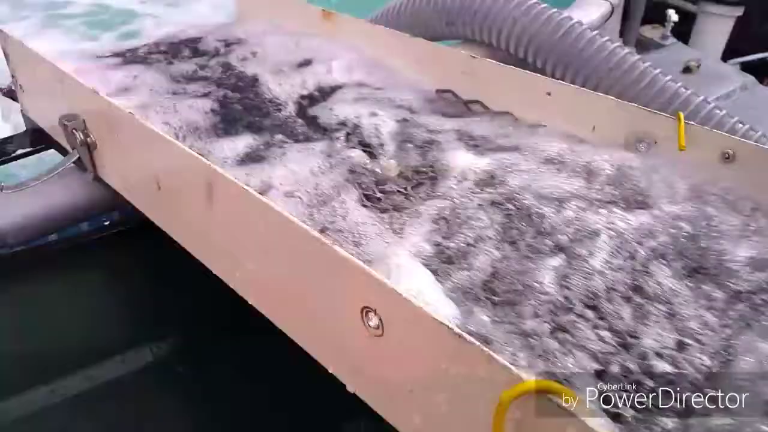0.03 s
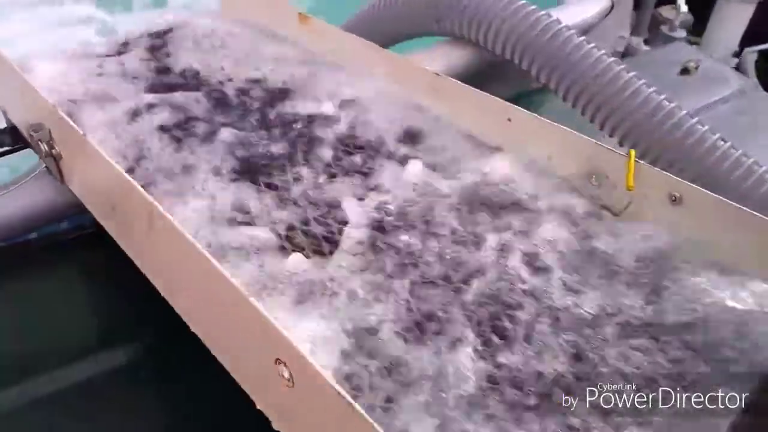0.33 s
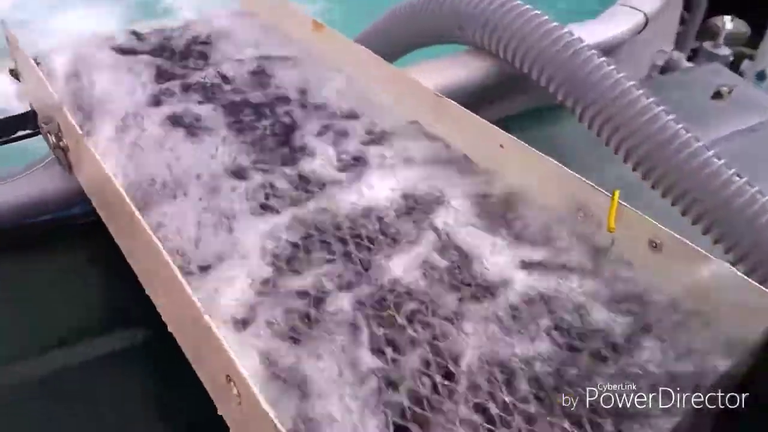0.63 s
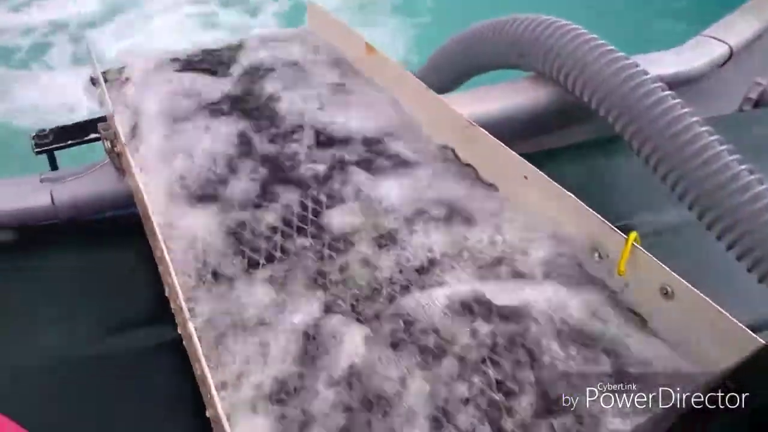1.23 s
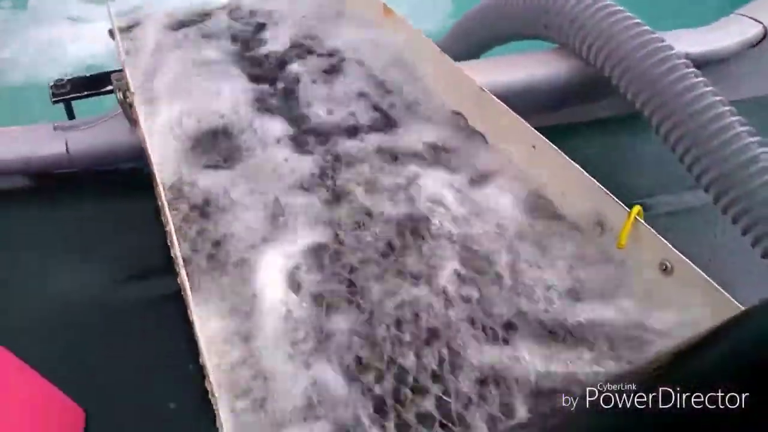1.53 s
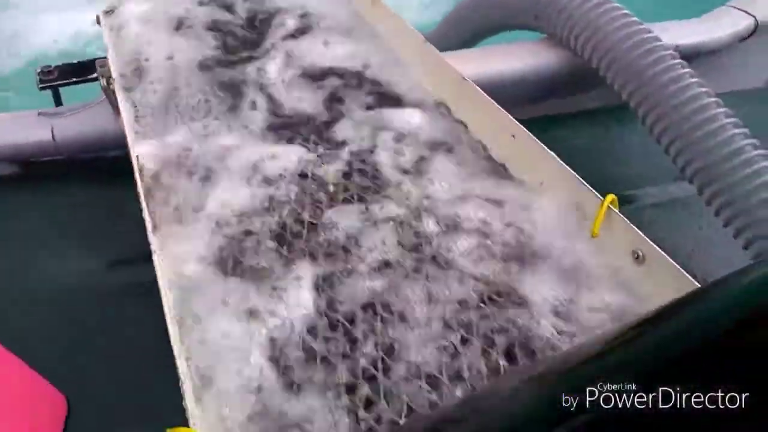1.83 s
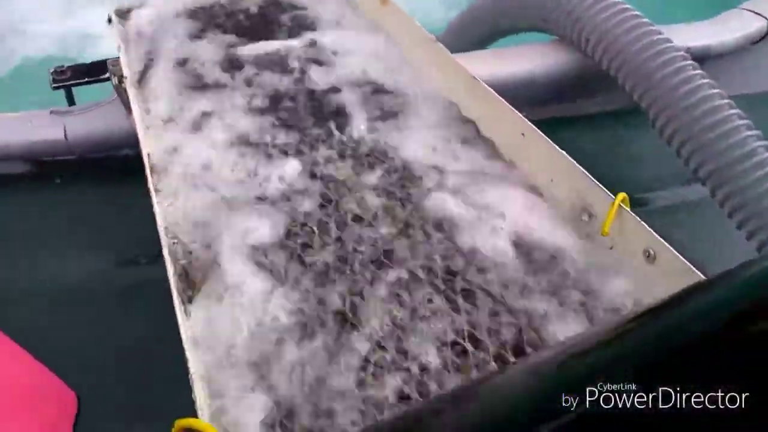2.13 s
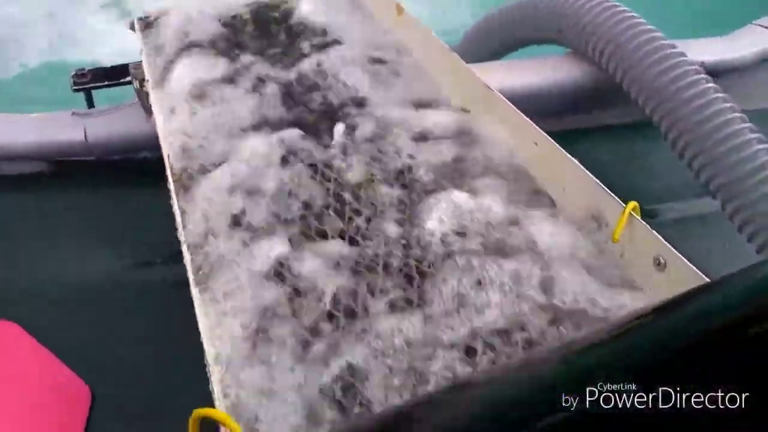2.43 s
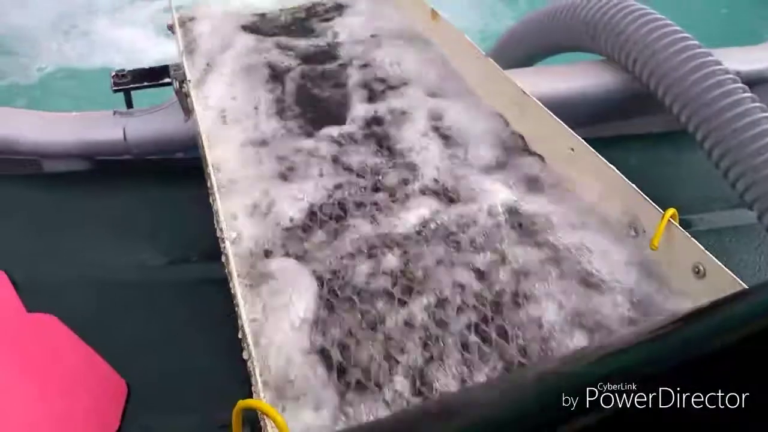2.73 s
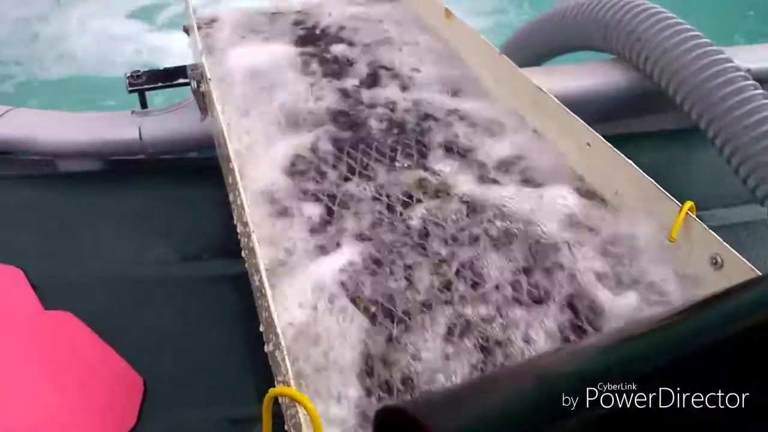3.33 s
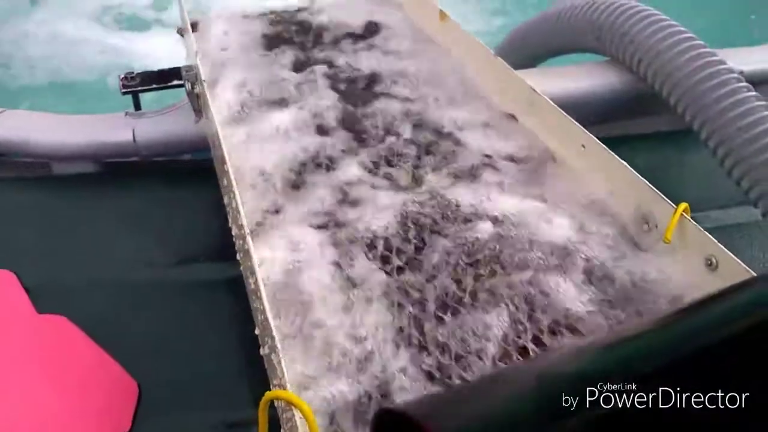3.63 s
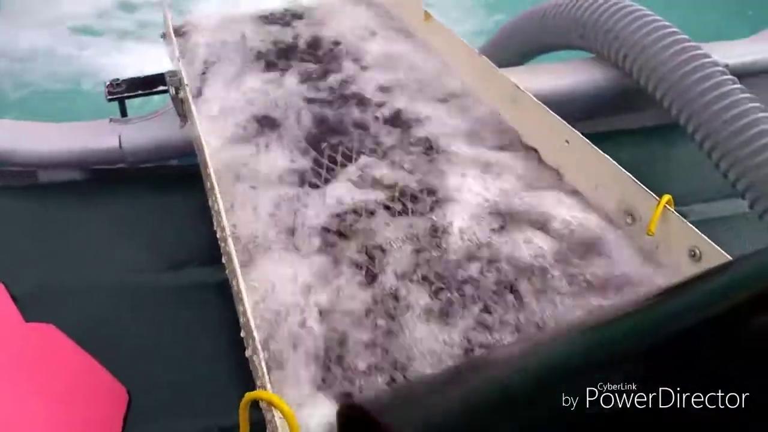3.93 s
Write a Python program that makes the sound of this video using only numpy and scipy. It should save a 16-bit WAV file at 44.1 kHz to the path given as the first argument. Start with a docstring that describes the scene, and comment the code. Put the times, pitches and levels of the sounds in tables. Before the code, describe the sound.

Water rushes and bubbles steadily down a metal sluice box outdoors, close by, with hissing foam and scattered glugs. A pump engine drones beside it, its low throb growing stronger in the second half.

```python
"""Water churns down a metal sluice box outdoors, while a one-cylinder pump engine runs beside it.
Tumbling over the riffles (the ridges in the box), the water rushes and traps air, which rings as a
mass of small bubbles and a few loud glugs. Spray hisses, foam fizzes and stray drops tick.
The engine's exhaust drones and puffs, its lowest tones throb through the hull, and the pump whistles.
Two closely spaced microphones pick it all up, and their stereo image is widened."""
import sys
import numpy as np
from scipy import signal
from scipy.fft import rfft, irfft
from scipy.io import wavfile

SR = 44100
rng = np.random.default_rng(int(sys.argv[2]) if len(sys.argv) > 2 else 0)


def dump_mix(stems):
    """Bounce the given channels to the path in sys.argv[1] as a 16-bit WAV at rate SR."""
    frames = np.atleast_2d(stems).T  # one column per channel
    limited = np.clip(frames, -1, 1)  # hard clip at full scale
    pcm = np.round(limited * 32767).astype(np.int16)
    wavfile.write(sys.argv[1], SR, pcm)


N = 176400  # samples: 4 seconds


def from_db(db):
    """Turn decibels into a number to multiply by."""
    return 10 ** (np.asarray(db) / 20)


def rms_one(x):
    """Scale a signal so that its average power is 1."""
    return x / np.sqrt(np.mean(x ** 2) + 1e-20)


def in_time(rows):
    """Join (time, value) points with straight lines, giving a value for every sample."""
    return np.interp(np.arange(N) / SR, *np.transpose(rows))


def at_hz(points, hz):
    """Look up (pitch, value) points on a scale where every octave is equally wide."""
    freqs, values = np.transpose(points)
    return np.interp(np.log(hz + 1e-9), np.log(freqs), values)


def bins():
    """The frequency in Hz of each slot in a spectrum."""
    return np.arange(N // 2 + 1) * SR / N


def drift(rate_hz):
    """A smooth random wobble, about 1 in size; a higher rate wobbles faster."""
    step, warm_up = 40, 2000  # one random value every 40 samples
    memory = np.exp(-2 * np.pi * step * rate_hz / SR)
    noise = rng.standard_normal(N // step + warm_up + 2)
    slow = signal.lfilter([1], [1, -2 * memory, memory * memory], noise)[warm_up:]
    return np.interp(np.arange(N) / step, np.arange(len(slow)), rms_one(slow))


def pan(db):
    """Share a sound between left and right: positive dB leans left, negative leans right."""
    gains = from_db(np.array([np.atleast_1d(db), -np.atleast_1d(db)]) / 2)
    return gains / np.sqrt(np.mean(gains ** 2, axis=0))


def place(x, pan_db, lag_s):
    """Lean a stereo sound to one side and delay its right channel."""
    late_right = irfft(rfft(x[1]) * np.exp(-2j * np.pi * bins() * lag_s), N)
    return pan(pan_db) * np.array([x[0], late_right])


def colour(white, spectrum):
    """Shape the lows and highs of plain noise with (pitch, dB per Hz) points."""
    return irfft(rfft(white) * from_db(at_hz(spectrum, bins())) * np.sqrt(SR / 2), N)


def turbulence(likeness, patchy_db, flicker_hz, bands):
    """Noise in bands that each flicker on their own; likeness 1 makes left and right the same."""
    mid, side = rfft(rng.standard_normal((2, N)))
    both = np.sqrt(1 + likeness) * mid + np.sqrt(1 - likeness) * side * [[1], [-1]]
    edges_hz = np.r_[0, np.geomspace(200, SR / 2, bands)]
    out = 0
    for low, high in zip(edges_hz, edges_hz[1:]):
        band = irfft(both * ((bins() >= low) & (bins() < high)), N)
        out = out + band * from_db(patchy_db * drift(flicker_hz))
    return rms_one(out)


def ring_bubbles(rows, rise_per_cycle=0.022):
    """Each bubble swells, rings and dies away, while its pitch can slide upward."""
    out = np.zeros((2, N + SR))
    for peak_s, hz, db, pan_db, swell_cycles in rows:
        cycles = np.arange(int(6 * swell_cycles * SR / hz)) * hz / SR
        age = cycles / swell_cycles  # 1 at the loudest moment
        loudness = (age * np.exp(1 - age)) ** 2
        glide = rise_per_cycle * (cycles - swell_cycles) ** 2 / 2
        ring = loudness * np.sin(2 * np.pi * (cycles + glide))
        start = max(int((peak_s - swell_cycles / hz) * SR), 0)
        out[:, start:start + len(ring)] += from_db(db) * pan(pan_db) * ring
    return out[:, :N]


def whine(pitch_hz=5070, width_hz=41, level_db=-49.5):
    """The pump's thin, unsteady whistle: a very narrow band of noise."""
    peak = 1 / (1 + ((bins() - pitch_hz) / width_hz) ** 2)
    whistle = irfft(rfft(rng.standard_normal((2, N))) * peak, N)
    return from_db(level_db) * pan(-12) * rms_one(whistle)


# How strongly the hull throbs. Columns: time_s, level_db
HULL_THROB = [(0, -8), (1.2, -0.5), (2.2, -3.5), (2.7, 8), (4, 5.5)]


def rumble(level_db=-3):
    """Low noise that swells with the hull's throb, by twice as many decibels."""
    noise = rng.standard_normal((2, N)) * from_db(level_db + 2 * in_time(HULL_THROB))
    return colour(noise, [(60, -96), (95, -74.5), (130, -64.5), (160, -72.5), (220, -100), (500, -130)])


# How often the cylinder fires. Columns: time_s, rate_hz
FIRING_RATE = [(0, 27.38), (2, 27.61), (4, 27.78)]


def count_firings():
    """The engine's running count of firings, rising smoothly by 1 from each to the next."""
    return np.cumsum(in_time(FIRING_RATE)) / SR


def exhaust_puffs(firings, level_db=-40, sharpness=1.5, pan_db=-4):
    """A puff of exhaust noise each time the cylinder fires."""
    puffs = rng.standard_normal((2, N)) * np.exp(sharpness * np.cos(2 * np.pi * firings))
    spectrum = [(100, -64), (400, 11), (700, -5), (1500, -7.5), (3500, -4.0), (12000, -33)]
    return from_db(level_db) * pan(pan_db) * rms_one(colour(puffs, spectrum))


# The tones in the exhaust's drone. Columns: times_firing_rate, level_db, left_minus_right_db
EXHAUST_TONES = [(2, -10, 2), (3, -13, -3), (4, -12.5, -2), (5, -12.5, 7), (6, 2.5, -6), (7, -11.5, -12),
                 (8, -10.5, -10), (10, -6.5, 2.5), (11, -9, -2), (12, -1.5, -8.5), (13, -5.5, -2),
                 (14, -2, -11), (15, -4.5, -21), (16, -11, 3), (17, -8.5, -16), (19, -18, -15),
                 (21, -7.5, -1)]


def exhaust_drone(firings, level_db=-33, hull_top_hz=150, jitter_rad=0.015):
    """Exhaust pulses blend into a stack of wavering tones; the lowest throb through the hull."""
    firings = firings + jitter_rad * drift(5.2) / (2 * np.pi)
    out = 0
    for multiple, tone_db, pan_db in EXHAUST_TONES:
        in_hull = multiple * FIRING_RATE[0][1] < hull_top_hz
        waver_db, right_lag_rad = (1.0, 1.68) if in_hull else (0.8, 0.93)
        throb_db = in_time(HULL_THROB) if multiple in (4, 5) else 0
        # The hull smears the pulses: each tone is shifted at random, a little apart on each side.
        smear_rad = 1.35 * rng.standard_normal() + 0.21 * rng.standard_normal((2, 1))
        phase = 2 * np.pi * multiple * firings + smear_rad - [[0], [right_lag_rad]]
        gain = from_db(level_db + tone_db + throb_db + waver_db * drift(5))
        out = out + gain * pan(pan_db) * np.cos(phase)
    return np.sqrt(2) * out


# Stray drops hitting the box. Columns: start_s, pitch_hz, level_db
STRAY_DROPS = [(0.2116, 7870, -20), (0.5282, 3920, -27.5), (1.5219, 3380, -25), (1.8557, 3420, -26),
               (2.148, 3960, -23.5)]


def drops(decay_s=0.0029, pan_db=-2):
    """Each drop lands with a tick: a quick burst of noise about an octave wide."""
    out = np.zeros(N)
    for start_s, hz, db in STRAY_DROPS:
        age_s = np.arange(N) / SR - start_s
        band = signal.butter(1, [hz / np.sqrt(2), hz * np.sqrt(2)], "band", fs=SR, output="sos")
        spatter = rms_one(signal.sosfilt(band, rng.standard_normal(N)))
        fade = (age_s >= 0) * np.exp(-np.abs(age_s) / decay_s)
        out += from_db(db) * spatter * fade
    return pan(pan_db) * out


# The splash fades as the microphones turn away, then creeps back. Columns: time_s, level_db
SPLASH_LEVEL = [(0, -7), (.2, -4.5), (.24, -10.5), (.48, -15), (.6, -39), (4, -18)]
# The splash's bright tone. Columns: pitch_hz, level_db_per_hz
SPLASH_TONE = [(2500, -76), (5500, -61), (8000, -65.5), (10500, -63), (14000, -80)]


def splash():
    """Water splashes off the end of the box with a bright hiss."""
    return colour(rng.standard_normal((2, N)) * from_db(in_time(SPLASH_LEVEL)), SPLASH_TONE)


# How strong the spray and its fizz are. Columns: time_s, level_db
SPRAY_LEVEL = [(0, 1.5), (.22, -0.5), (.48, 2.4), (.55, -0.5), (.7, -0.5), (.9, 0.5), (1.15, -0.5),
               (1.55, 0.7), (1.88, 0), (1.94, -2), (2.0, 0.5), (2.42, 0.5), (2.54, -2.3), (2.59, 0.2),
               (3.56, 0), (3.76, 2.5), (3.83, 0.5)]
# The tone of the spray's hiss. Columns: pitch_hz, level_db_per_hz
SPRAY_TONE = [(300, -68.5), (900, -69.5), (1350, -68), (1620, -59), (2000, -61.5), (2600, -65),
              (4000, -69.5), (5400, -70.5), (7000, -71.5), (8300, -71), (10500, -71.5), (14000, -79)]
# Which side each part of the hiss leans to. Columns: pitch_hz, left_minus_right_db
SPRAY_SIDES = [(1500, -10), (2300, 8.5), (3000, -6.5), (4200, -3.5), (7000, -2), (9000, -4), (10400, -0.5),
               (12000, -4), (14000, -8)]


def spray(flutter_db=0.55, crackle_db=0.5):
    """Foam and droplets hiss in quick surges, with a fine crackle."""
    surge = from_db(in_time(SPRAY_LEVEL) + flutter_db * drift(28))
    noise = turbulence(likeness=0, patchy_db=1.0, flicker_hz=44, bands=16)
    crackly = rms_one(noise * from_db(crackle_db * drift(430)))
    hiss = colour(crackly * surge, SPRAY_TONE)
    return irfft(rfft(hiss) * pan(at_hz(SPRAY_SIDES, bins())), N)


def fizz(count=3200, level_db=-48, spread_db=4.5, db_per_octave=-2, pan_db=-3, width_db=25):
    """Tiny bubbles ping as the foam breaks, over nearly three octaves."""
    when, pitch, size, where = rng.random((count, 4)).T
    octave = pitch * np.log2(7)
    hz = 1900 * 2 ** octave
    strength = np.minimum(-np.log(1 - size), 4)  # mostly small, now and then large
    db = level_db + db_per_octave * octave + spread_db * strength
    sides_db = pan_db + width_db * (2 * where - 1)
    swell_cycles = np.full(count, 18)
    pings = ring_bubbles(zip(when * N / SR, hz, db, sides_db, swell_cycles), rise_per_cycle=0)
    return from_db(in_time(SPRAY_LEVEL)) * pings


# The tone of the rushing water. Columns: pitch_hz, level_db_per_hz
RUSH_TONE = [(25, -86), (40, -82), (60, -64), (100, -63), (140, -58), (230, -66.5), (330, -59), (570, -55),
             (700, -57.5), (830, -69.5), (1100, -55.5), (1380, -71), (1600, -66), (2200, -76.5),
             (4000, -80.5)]


def rush():
    """The low roar of water tumbling down the box."""
    return colour(turbulence(likeness=0.78, patchy_db=2.5, flicker_hz=33, bands=14), RUSH_TONE)


# How strongly a bubble rings at each pitch. Columns: pitch_hz, boost_db
BUBBLE_BOOST = [(260, -1.5), (400, 0), (570, 2), (800, 3.5), (1100, 7.5), (1380, 2.5), (1600, 0),
                (2100, -35)]


def bubbles(per_second=950, level_db=-38, spread_db=3.5, width_db=5):
    """Small bubbles of trapped air ring all across the box, most faint and a few strong."""
    count = int(per_second * N / SR)
    when, pitch, size, where = rng.random((count, 4)).T
    low_hz, high_hz = BUBBLE_BOOST[0][0], BUBBLE_BOOST[-1][0]
    hz = low_hz * (high_hz / low_hz) ** (pitch ** 0.75)
    strength = np.minimum(-np.log(1 - size), 3.3)
    db = level_db + at_hz(BUBBLE_BOOST, hz) + spread_db * strength
    sides_db = width_db * (2 * where - 1)
    swell_cycles = np.full(count, 1.288)
    return ring_bubbles(zip(when * N / SR, hz, db, sides_db, swell_cycles))


# Big pockets of air bursting. Columns: peak_s, pitch_hz, level_db, swell_cycles
AIR_POCKETS = [(0.1, 544, -20, 1.88), (0.199, 660, -12, 0.56), (0.2, 880, -24, 1.54),
               (0.266, 940, -20, 1.8), (0.328, 950, -22, 1.46), (0.46, 1030, -17.5, 1.7),
               (0.539, 1510, -14, 2.4), (0.569, 1350, -20.5, 1.84), (0.764, 1430, -20.5, 2),
               (1.049, 1430, -18, 2), (1.164, 1130, -20.5, 2.53), (1.311, 930, -18.5, 2),
               (1.462, 505, -16, 1.9), (1.474, 454, -20.5, 2.6), (1.574, 1520, -20, 3.3),
               (1.575, 854, -18, 0.87), (1.698, 1030, -20.5, 1.57), (1.763, 1120, -18.5, 2.3),
               (1.766, 400, -14, 0.95), (1.846, 615, -19.5, 1.7), (1.872, 390, -14, 1.66),
               (1.881, 470, -11, 1.08), (2.0, 645, -16, 0.75), (2.184, 1410, -18, 3),
               (2.356, 1450, -20, 2.3), (2.384, 765, -20.5, 2.1), (2.489, 910, -16.5, 1.16),
               (2.802, 1690, -23, 2), (2.972, 696, -13, 3.06), (3.067, 850, -21.5, 4.7),
               (3.131, 480, -13.5, 0.74), (3.242, 1280, -17, 2.7), (3.276, 1280, -20, 2.2),
               (3.334, 980, -15, 1.16), (3.412, 575, -12, 1.5), (3.483, 1140, -17.5, 1.86),
               (3.514, 930, -20.5, 2.6), (3.515, 1740, -17.5, 3), (3.601, 990, -19, 1.9),
               (3.632, 550, -14, 0.97), (3.692, 900, -20, 2.6), (3.745, 1500, -25, 2.5),
               (3.761, 1500, -25, 1.9)]


def glugs(boost_db=1.5):
    """Big pockets of air break out behind the riffles; some give a short plop, some ring on."""
    centred = [(peak_s, hz, db, 0, swell) for peak_s, hz, db, swell in AIR_POCKETS]
    return from_db(boost_db) * ring_bubbles(centred)


# How hard the water churns. Columns: time_s, level_db
CHURN_LEVEL = [(0, 1), (.5, -0.5), (.6, -1.5), (.8, -0.5), (.92, 0.5), (1.08, 0.5), (1.14, -1.5), (1.5, 0),
               (1.66, -1.2), (1.87, 0.5), (1.94, -2.5), (2.02, 0), (2.55, -0.5), (2.9, 0.5), (3.55, .5),
               (3.76, 2), (3.84, -2), (4, -0.5)]


def churning_water():
    """Over the riffles, the rush and the bubbles swell and ease together, with glugs on top."""
    water = from_db(in_time(CHURN_LEVEL)) * (rush() + bubbles()) + glugs()
    return place(water, pan_db=-5.5, lag_s=0.00014)


def scene():
    """The pump engine and the water in the sluice box, heard together."""
    firings = count_firings()
    pump = exhaust_drone(firings) + rumble() + exhaust_puffs(firings) + whine()
    return pump + spray() + splash() + churning_water() + fizz() + drops()


# How much of each microphone is taken away from the other. Columns: pitch_hz, share (0 to 1)
WIDENING = [(700, 0.12), (1100, 0.93), (2100, 0.79), (2500, 0.22), (3000, 0.48), (3444, 0.5), (4600, 0.11),
            (5750, 0.005), (7000, 0.14), (12000, 0)]
# Two narrow pitch bands where the middle of the stereo image goes quiet, sounding hollow.
# Columns: pitch_hz, half_width_hz, depth_db
CENTRE_DIPS = [(2287, 144, -36), (4580, 110, -8)]


def record(dry, lag_s=0.000435, cutoff_hz=14300):
    """Widen the stereo image, quieten its middle at two pitches and cut the highest treble."""
    hz, both = bins(), rfft(dry)
    share = at_hz(WIDENING, hz)
    other_side_late = np.exp(-2j * np.pi * hz * lag_s) * both[::-1]
    wide = (both - share * other_side_late) / np.sqrt(1 + share ** 2)
    dips_db = sum(db / (1 + ((hz - dip_hz) / width_hz) ** 4) for dip_hz, width_hz, db in CENTRE_DIPS)
    hollowed = wide + (from_db(dips_db) - 1) * wide.mean(axis=0)
    treble_cut = 1 / np.sqrt(1 + (hz / cutoff_hz) ** 400)  # very steep
    return irfft(hollowed * treble_cut, N)


dry = scene()
out = record(dry)
dump_mix(out)
```